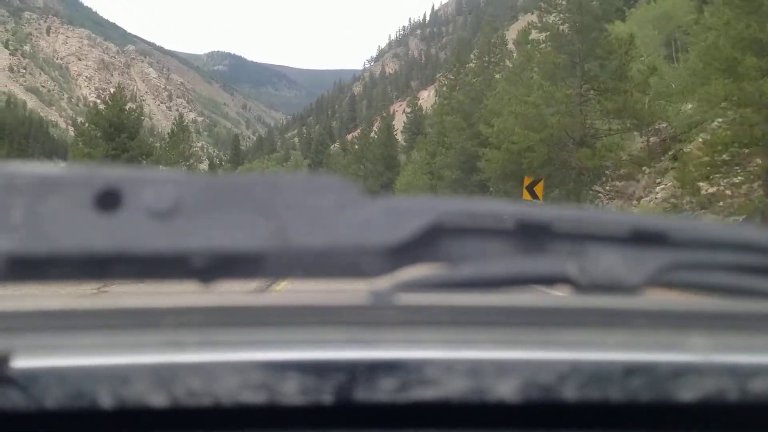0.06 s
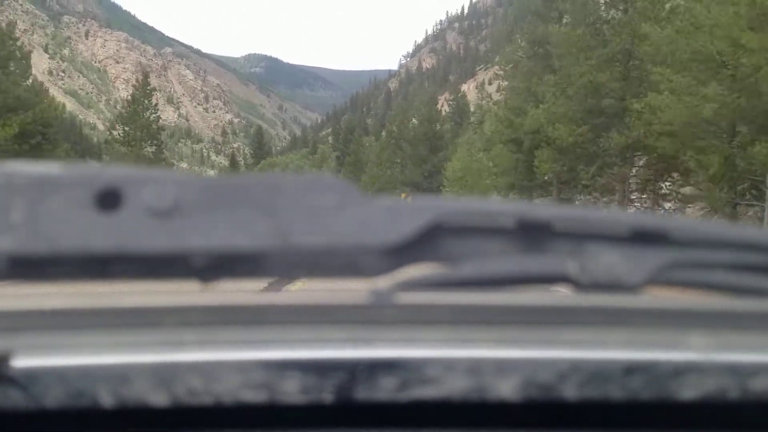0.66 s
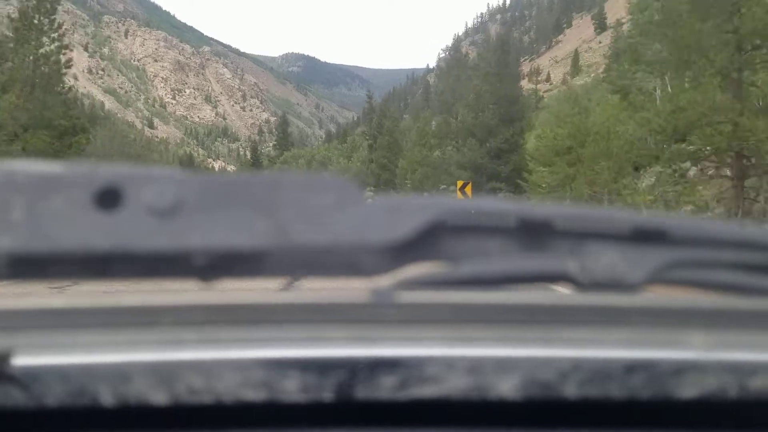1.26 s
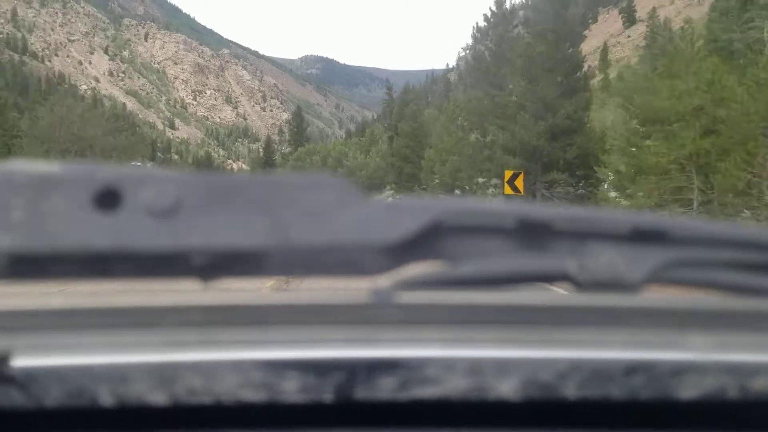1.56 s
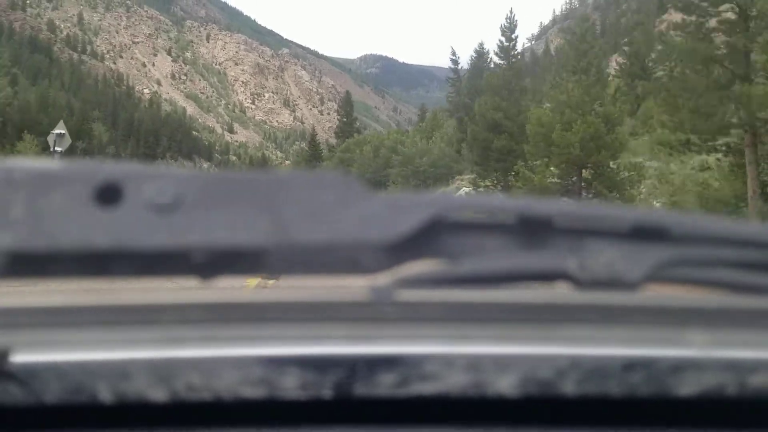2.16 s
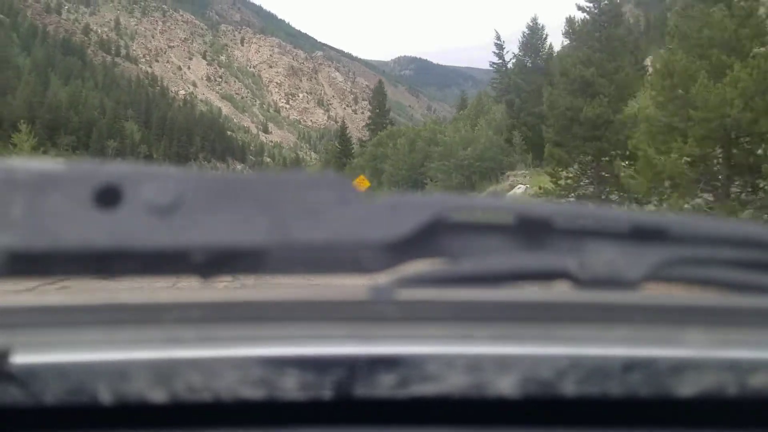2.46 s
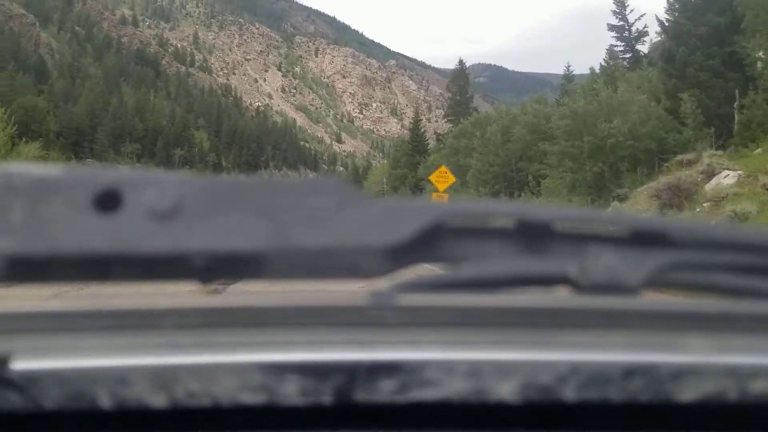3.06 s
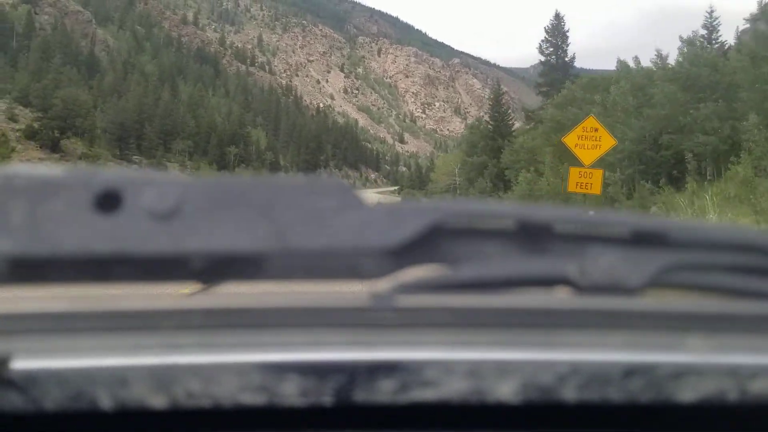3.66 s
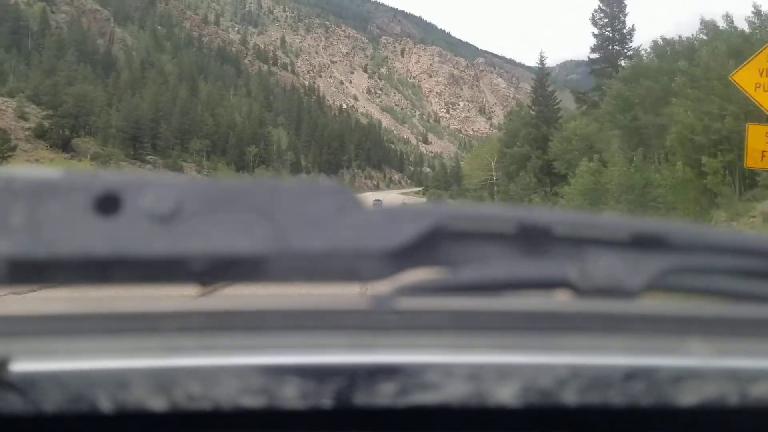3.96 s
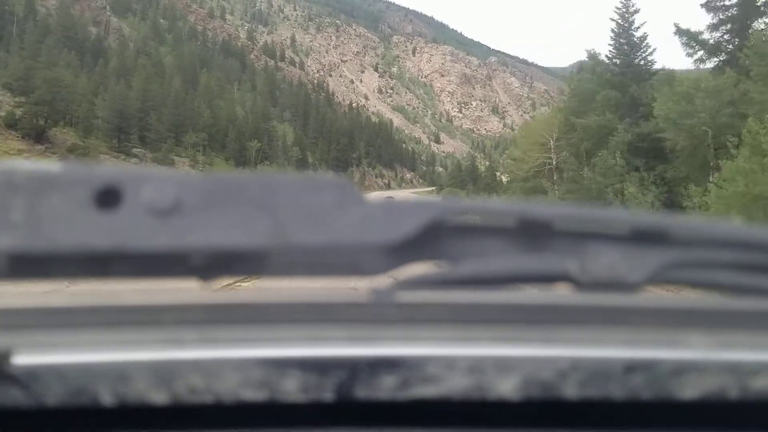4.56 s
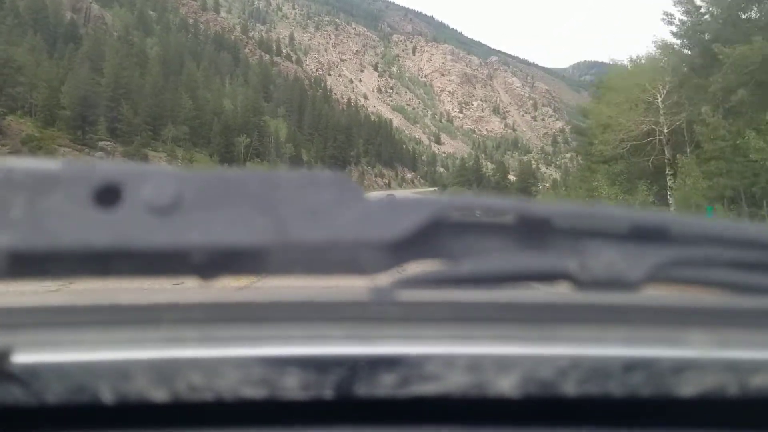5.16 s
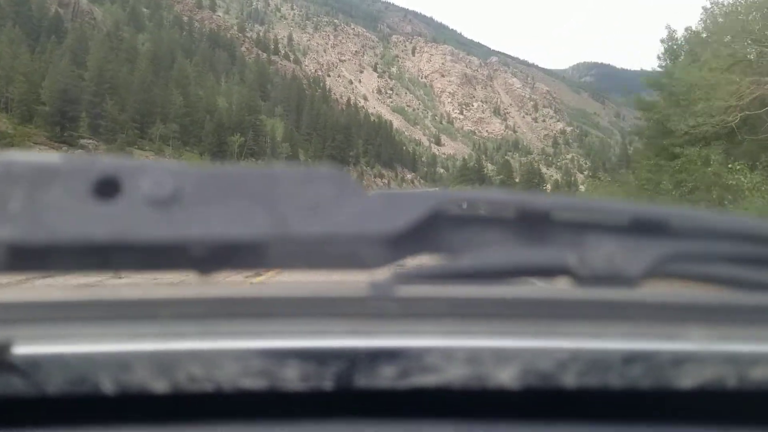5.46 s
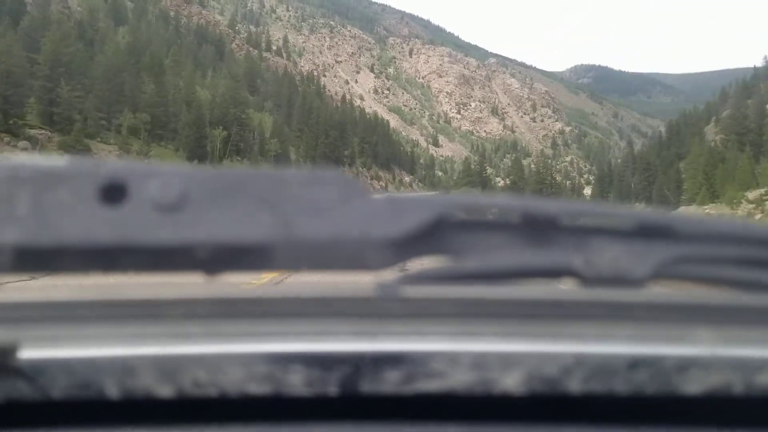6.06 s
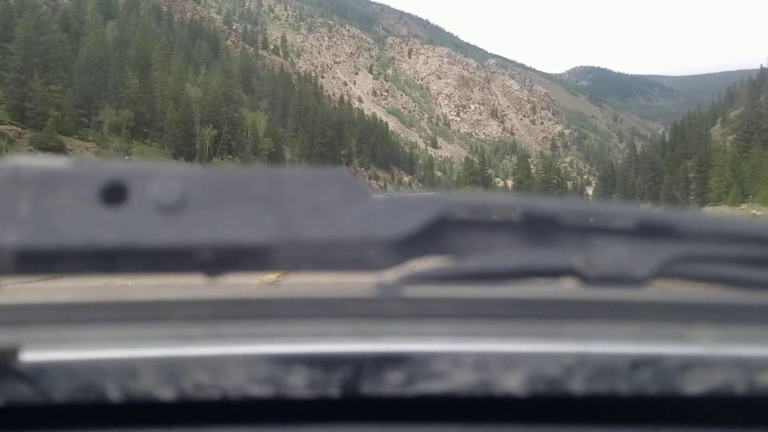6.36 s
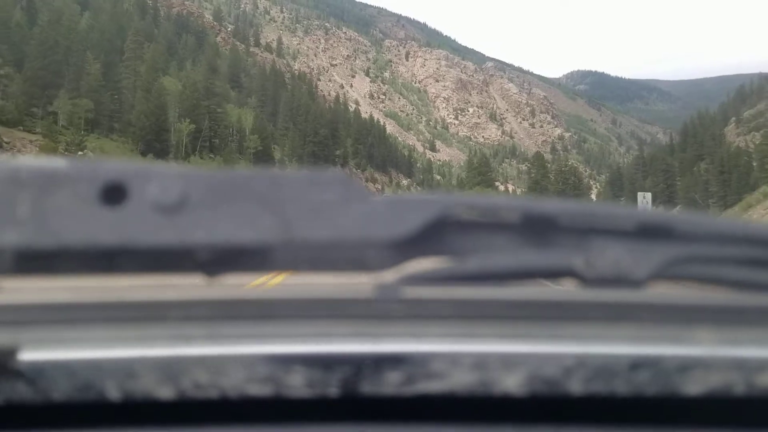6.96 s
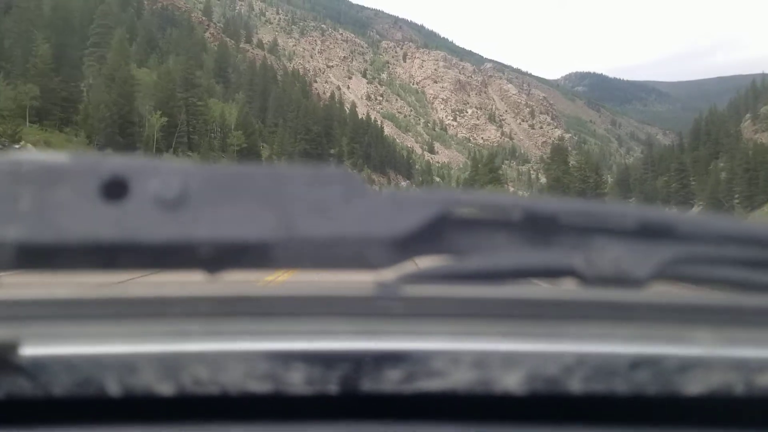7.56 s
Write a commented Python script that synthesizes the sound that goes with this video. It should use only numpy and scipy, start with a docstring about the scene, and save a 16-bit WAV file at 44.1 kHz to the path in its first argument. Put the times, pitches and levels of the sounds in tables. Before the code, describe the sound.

From a microphone on the dashboard of a moving car, deep road rumble and a low engine hum fill the cabin, with soft tyre roar and a little wind above them. The wheels thump briefly over a bump near the start, the road grows a bit rougher, and several more low thumps come later. Toward the end the plastic trim gives faint ticks and tiny squeaks, and the tyre noise eases slightly.

```python
"""Car cabin on a mountain road.

Heard from the dashboard at cruising speed. Uneven asphalt shakes the cabin's resonances, the engine
drones at its firing rate, the tyres roar and the wind rushes and hisses. Two groups of bumps
thump through the body; late on, loose trim ticks, knocks and squeaks faintly."""
import sys
import numpy as np
from scipy import signal
from scipy.fft import rfft, irfft
from scipy.io import wavfile
from scipy.ndimage import uniform_filter1d

SR = 44100
rng = np.random.default_rng(int(sys.argv[2]) if len(sys.argv) > 2 else 0)


def wrap_up_sound(samples):
    """Save the sound to the file named by the first command line argument, as 16-bit audio."""
    columns = np.atleast_2d(samples).T
    # keep every value between -1 and 1, then stretch to whole-number steps
    tamed = np.clip(columns, -1, 1)
    steps = np.round(tamed * 32767).astype(np.int16)
    wavfile.write(sys.argv[1], SR, steps)


N = 343980
TIME_S = np.arange(N) / SR
HZ = np.maximum(np.arange(N // 2 + 1) * SR / N, 1)

# asphalt, turning smooth near the end: time_s, coarseness_db
ASPHALT = [(0, -0.6), (1.3, 0.7), (1.7, -0.9), (2.45, -0.55), (3.6, 0.2), (4.0, 2), (5.4, 1.26),
           (5.9, -0.3), (6.6, -0.8), (7.0, -0.6), (7.33, -0.3), (7.52, -4), (7.8, -4)]


def from_db(db):
    """Decibels to gain."""
    return 10 ** (np.asarray(db) / 20)


def in_time(rows):
    """Each column of a curve at every sample."""
    time_s, *columns = np.transpose(rows)
    return [np.interp(TIME_S, time_s, column) for column in columns]


def in_frequency(rows):
    """Each column of a spectrum at every frequency."""
    hz, *columns = np.transpose(rows)
    return [np.interp(np.log(HZ), np.log(hz), column) for column in columns]


def butter(edge_hz, kind, order):
    """Response of a causal high- or low-pass."""
    return signal.freqs(*signal.butter(order, 1, kind, analog=True), HZ / edge_hz)[1]


def resonances(modes):
    """Response of each damped mode, one row a mode."""
    return np.array([from_db(db) / (1 + 1j * (HZ ** 2 - hz ** 2) / (HZ * width_hz))
                     for hz, width_hz, db in modes])


def pan(db):
    """Stereo gains, left louder by db."""
    return from_db(np.array([[db], [-db]]) / 2)


def drift(rate_hz):
    """Random wander of unit spread, mostly below rate_hz."""
    slow = irfft(rfft(rng.standard_normal(N)) / (1 + (HZ / rate_hz) ** 2), N)
    return slow / slow.std()


def cabin_noise(colour, steady_s):
    """Coloured stereo noise, level held near 1 over spans longer than steady_s."""
    # sound field at the dashboard: freq_hz, correlation, left_minus_right_db
    sound_field = [(56, .95, -.3), (80, .8, -1), (115, .78, -3), (170, .88, .3), (260, .7, 1),
                   (420, .68, 1.6), (560, .15, 1.3), (680, -.25, 3), (820, -.38, 7), (980, -.66, 4),
                   (1300, -.63, 3), (1600, -.1, 6), (2400, 0, 13), (3300, 0, 12.5), (4800, 0, 7),
                   (6800, 0, 7.5), (8600, 0, .3), (11000, 0, 1.3), (13000, 0, 6)]
    alike, lean_db = in_frequency(sound_field)
    alike = np.clip(alike, -.99, .99)
    left, right = from_db(lean_db / 2), from_db(-lean_db / 2)
    common, opposed = rfft(rng.standard_normal((2, N))) * np.sqrt([1 + alike, 1 - alike])
    centre = np.sqrt(left ** 2 + right ** 2 + 2 * alike * left * right)
    noise = irfft(np.array([left * (common + opposed), right * (common - opposed)]) * colour / centre, N)
    power = uniform_filter1d(np.mean(noise ** 2, axis=0), int(steady_s * SR))
    noise = noise / np.sqrt(power + 1e-20)
    return noise / noise.mean(axis=0).std()


def cabin_modes(drive, cutoff_hz=366):
    """Mode responses to "rolling" or "bump"; the car body dulls them above cutoff_hz."""
    # cabin air, panels and tyre cavities: freq_hz, width_hz, rolling_db, bump_db
    modes = [(55.5, 9.1, -0.5, 1), (83, 16, -9, -34), (115, 17, -5, -2), (141.3, 11, -4.5, 2),
             (160.9, 7.3, -6, -3), (172, 13, -9.5, -24), (190, 12, -19, -17), (231, 11.4, -4.5, -6),
             (256, 14.2, -7.5, 1), (297, 22.6, -15, -5), (337.6, 10.5, -14.5, -14)]
    gain_column = {"rolling": 2, "bump": 3}[drive]
    return resonances(np.array(modes)[:, [0, 1, gain_column]]) * np.abs(butter(cutoff_hz, "low", order=2))


def wavy_road():
    """Rise of boom and rumble in dB as the car rolls through each wavy stretch."""
    # wavy, patched road: middle_s, length_s, boom_rise_db, rumble_rise_db
    stretches = [(0.85, 1.6, 2.5, 1.3), (1.52, .46, 10.5, 2.5), (4.1, 1.5, 3, 1.2), (5.55, 0.67, 9.5, 4),
                 (6.048, 0.39, 6.5, 5), (6.39, 0.58, 8.5, 2), (7.1, 0.63, 0.5, 2), (7.5, .85, 6, 0)]
    rise_db = 0
    for middle_s, length_s, boom_db, rumble_db in stretches:
        hump = np.cos(np.pi * np.clip((TIME_S - middle_s) / length_s, -.5, .5)) ** 2
        rise_db = rise_db + np.outer([boom_db, rumble_db], hump)
    return rise_db


def road(crossover_hz=87.4, low_cut_hz=45.8, boom_throb_db=2.5, rumble_throb_db=1.14):
    """Asphalt shakes every mode at random: long waves make the boom, coarse grain the rumble."""
    coarse_db, = in_time(ASPHALT)
    coarse_db = np.minimum(coarse_db, -0.05)   # coarser asphalt adds no more rumble
    boom_rise_db, rumble_rise_db = wavy_road()
    mode_power = np.sum(np.abs(cabin_modes("rolling")) ** 2, axis=0)
    colour = np.sqrt(mode_power) * butter(low_cut_hz, "high", order=4)
    boom = cabin_noise(colour * butter(crossover_hz, "low", order=6), steady_s=.15)
    rumble = cabin_noise(colour * butter(crossover_hz, "high", order=6), steady_s=.12)
    boom_db = -26 + boom_rise_db + boom_throb_db * drift(rate_hz=14)
    rumble_db = -23 + 1.13 * coarse_db + rumble_rise_db + rumble_throb_db * drift(rate_hz=15.5)
    return boom * from_db(boom_db) + rumble * from_db(rumble_db)


def engine(octave_db=-19.5, waver_hz=0.19, waver_db=0.7, left_lag_s=0.00068):
    """Firing pulses drone through the cabin with a weak octave, reaching the left side later."""
    # engine speed: time_s, firing_hz
    speed = [(0, 91.94), (1.2, 92.03), (3.0, 92.83), (4.2, 92.62), (5.3, 93.94), (6.3, 93.2), (7.1, 92.4),
             (7.8, 91.5)]
    # engine load, eased off after the second group of bumps: time_s, level_db
    load = [(0, -21.6), (1.5, -22), (1.8, -26.5), (2.5, -22.5), (3.15, -25.5), (3.8, -21.5), (4.3, -20.5),
            (5.45, -21), (5.7, -27.5), (6.1, -26.5), (6.36, -20), (6.58, -32.5), (6.9, -26), (7.8, -25)]
    firing_hz, = in_time(speed)
    level_db, = in_time(load)
    cycles = np.cumsum(firing_hz + waver_hz * drift(rate_hz=2.3)) / SR
    phase = 2 * np.pi * (cycles - firing_hz * np.array([[left_lag_s], [0]]))
    drone = np.sqrt(2) * (np.sin(phase) + from_db(octave_db) * np.sin(2 * phase))
    return drone * from_db(level_db + waver_db * drift(rate_hz=5.4)) * pan(db=-2)


def tyres(roar_db=-33, tread_db=-43.5, grain_db=0.88):
    """The carcass roars and the tread pumps air near 1 kHz, both grainy and louder on coarse asphalt."""
    # carcass roar: freq_hz, density_db
    roar_spectrum = [(230, -14.5), (320, -1), (440, 0), (550, -5), (650, -12), (760, -20.5), (1000, -44.5)]
    # tread pumping: freq_hz, density_db
    tread_spectrum = [(560, -18), (680, -2), (745, -2), (790, 2), (860, -2), (965, 1), (1040, -3.5),
                      (1130, -6.5), (1300, -11), (1600, -15), (2400, -42)]
    coarse_db, = in_time(ASPHALT)
    roar = cabin_noise(from_db(in_frequency(roar_spectrum)[0]), steady_s=.2)
    tread = cabin_noise(from_db(in_frequency(tread_spectrum)[0]), steady_s=.19)
    roar *= from_db(roar_db + 0.98 * coarse_db)
    tread *= from_db(tread_db + 1.1 * coarse_db)
    return (roar + tread) * from_db(grain_db * drift(rate_hz=24))


def wind(rush_db=-52.5, hiss_db=-53, flutter_db=1.0):
    """Air passing the car rushes and hisses; eddies make both flutter together."""
    # level of the rush and hiss, dipping suddenly just after the bumps: time_s, swing_db
    level_curve = [(0, -0.3), (0.65, 1.0), (0.85, -0.2), (1.38, 1.5), (1.55, -1.5), (1.8, -2), (2.02, 0.1),
                   (3.15, -1.5), (3.62, -1), (3.98, 2), (5.15, 1.5), (5.42, 4), (5.58, -0.8), (6.45, -0.5),
                   (6.85, -2), (7.42, 0.3), (7.55, -0.5), (7.8, 0.5)]
    # rush round the pillars: freq_hz, density_db
    rush_spectrum = [(900, -11.5), (1600, -2.5), (2000, 2), (2500, -3.5), (3200, -7), (4200, -13),
                     (5500, -23), (8000, -45)]
    # wind hiss, with a bright microphone resonance near 11.7 kHz: freq_hz, density_db
    hiss_spectrum = [(2500, -5.5), (4800, -11), (6000, -8), (7600, -6.5), (8600, -14), (10000, -6.5),
                     (11000, 3), (11900, 3), (12800, 1), (14000, -6.5), (15800, -13.5)]
    swing_db, = in_time(level_curve)
    rush = cabin_noise(from_db(in_frequency(rush_spectrum)[0]), steady_s=.51)
    hiss = cabin_noise(from_db(in_frequency(hiss_spectrum)[0]), steady_s=.37)
    rush *= from_db(rush_db + 0.95 * swing_db)
    hiss *= from_db(hiss_db + 1.13 * swing_db)
    return (rush + hiss) * from_db(flutter_db * drift(rate_hz=45))


def bumps(low_cut_hz=36):
    """Each bump is a soft push through the tyre; the cabin booms on after it."""
    # wheels meeting bumps: time_s, peak_db, contact_s
    impacts = [(1.431, 0, 0.0052), (1.465, -7.5, .0058), (1.536, -11, 0.0027), (5.4892, -3.5, 0.0038),
               (5.542, -6, 0.0049), (5.622, -8, 0.0054), (5.968, -9.5, 0.0046), (6.062, -5, 0.0043),
               (6.141, -10.5, 0.0037)]
    response = cabin_modes("bump").sum(axis=0) * butter(low_cut_hz, "high", order=2)
    thumps = 0
    for time_s, peak_db, contact_s in impacts:
        push = np.exp(-np.minimum((2 * (TIME_S - time_s) / contact_s) ** 2, 50))
        thump = irfft(rfft(push) * response, N)
        thumps = thumps + from_db(peak_db) * thump / np.abs(thump).max()
    return thumps * pan(db=-1)


def strike(touches, modes, cutoff_hz):
    """Touches ring a small part's modes; a softer contact has a lower cutoff."""
    response = resonances(modes).sum(axis=0) * butter(cutoff_hz, "low", order=4)
    impulses = np.zeros(N)
    for start_s, peak_db in touches:
        impulses[int(start_s * SR)] = from_db(peak_db)
    return irfft(rfft(impulses) * response, N) / np.abs(irfft(response, N)).max()


def trim_ticks():
    """Hard touches ring small trim, high and briefly."""
    # trim contacts: start_s, peak_db
    touches = [(5.6298, -37), (5.6782, -39), (6.5377, -41), (6.9887, -28), (7.0165, -36), (7.6821, -37),
               (7.757, -40)]
    # trim modes: freq_hz, width_hz, gain_db
    modes = [(7500, 1200, -9), (10500, 900, -6), (13400, 700, 0), (14900, 600, 0)]
    return strike(touches, modes, cutoff_hz=17000) * pan(db=2.5)


def panel_knocks():
    """Soft touches ring a loose panel on the left, dully."""
    # panel contacts: start_s, peak_db
    touches = [(5.712, -28), (5.797, -34), (6.917, -29)]
    # panel modes: freq_hz, width_hz, gain_db
    modes = [(745, 27, -3), (807, 35, 7), (875, 27, -8)]
    return strike(touches, modes, cutoff_hz=1100) * pan(db=11)


def squeaks(width_s=0.004, jitter_rad=0.5):
    """Plastic slips on plastic for a few uneven cycles."""
    # trim rubbing: middle_s, pitch_hz, peak_db
    slips = [(7.361, 2680, -46), (7.410, 2690, -43), (7.586, 2150, -49)]
    jitter = jitter_rad * drift(rate_hz=400)
    chirps = 0
    for middle_s, pitch_hz, peak_db in slips:
        envelope = from_db(peak_db) / (1 + ((TIME_S - middle_s) / width_s) ** 2) ** 2
        chirps = chirps + envelope * np.sin(2 * np.pi * pitch_hz * TIME_S + jitter)
    return chirps * pan(db=6)


def scene():
    """Everything that reaches the dashboard."""
    return road() + engine() + tyres() + wind() + bumps() + trim_ticks() + panel_knocks() + squeaks()


def record(dry):
    """Soft peak limiting, then a steep low-pass at 15.8 kHz."""
    rounded = dry / (1 + dry ** 8) ** (1 / 8)
    return signal.sosfilt(signal.ellip(12, .1, 90, 15800, fs=SR, output="sos"), rounded)


dry = scene()
out = record(dry)
wrap_up_sound(out)
```